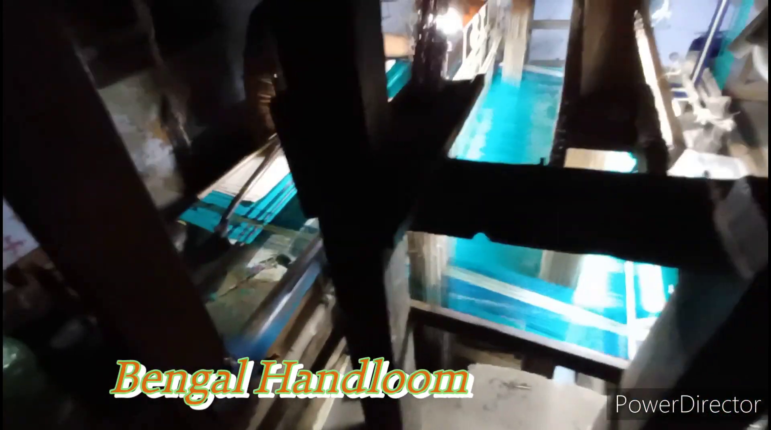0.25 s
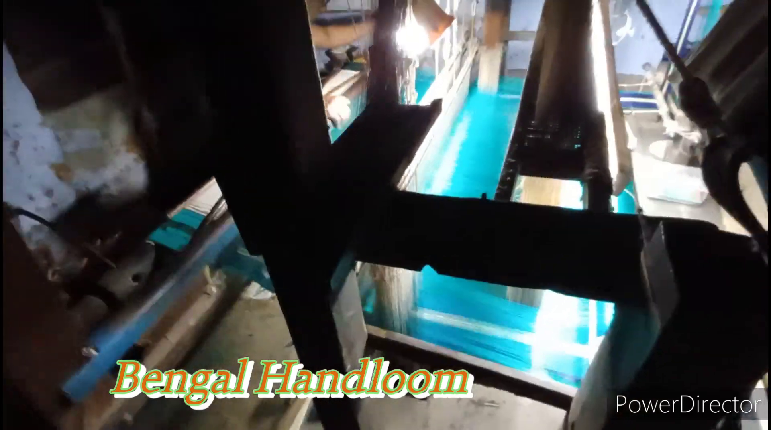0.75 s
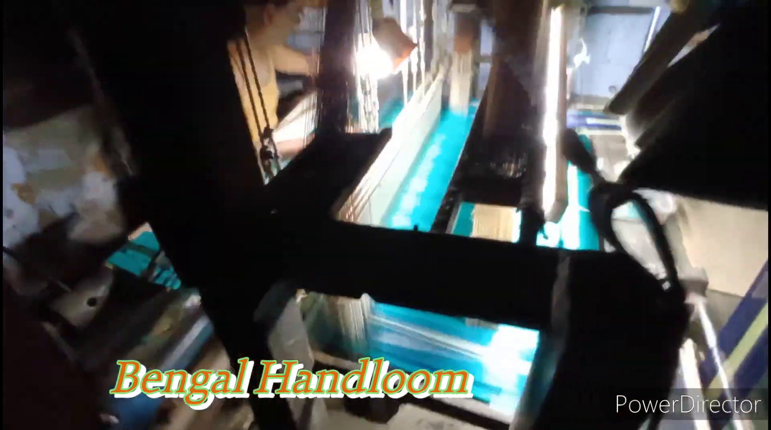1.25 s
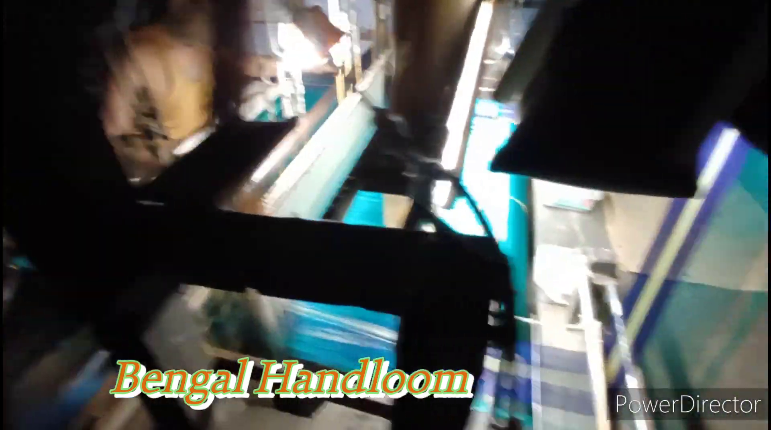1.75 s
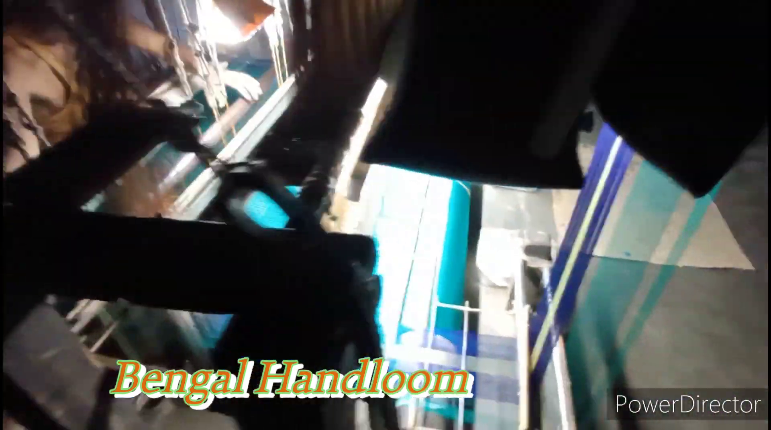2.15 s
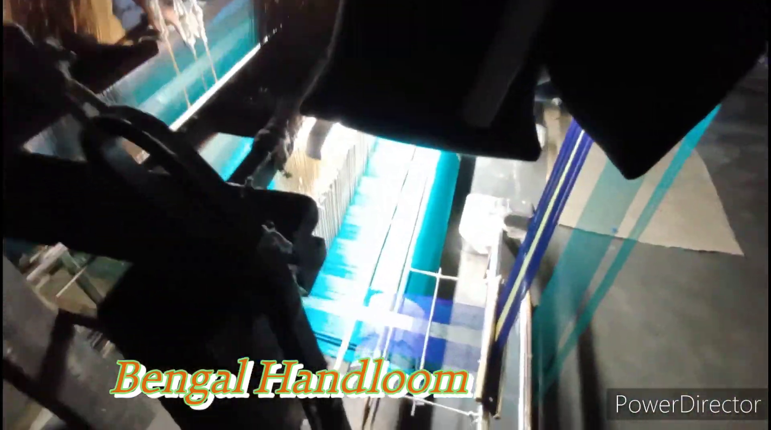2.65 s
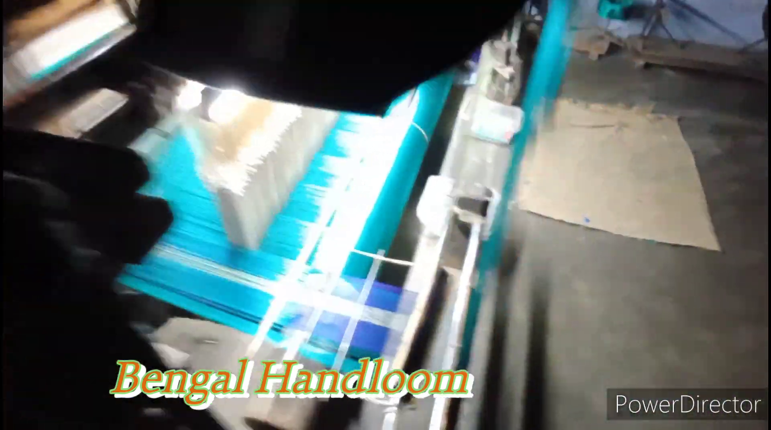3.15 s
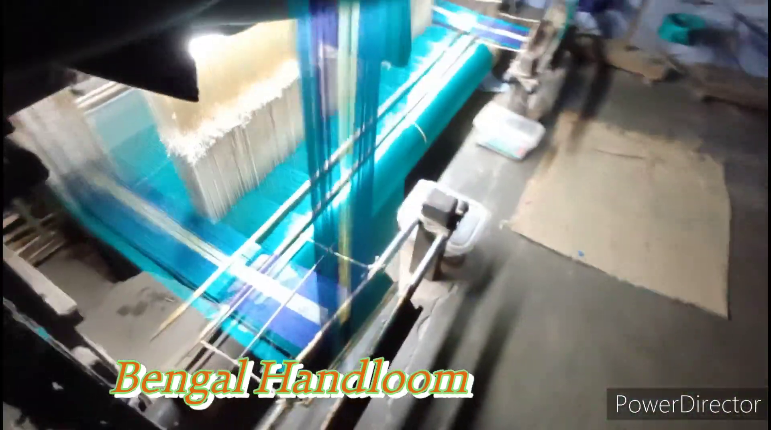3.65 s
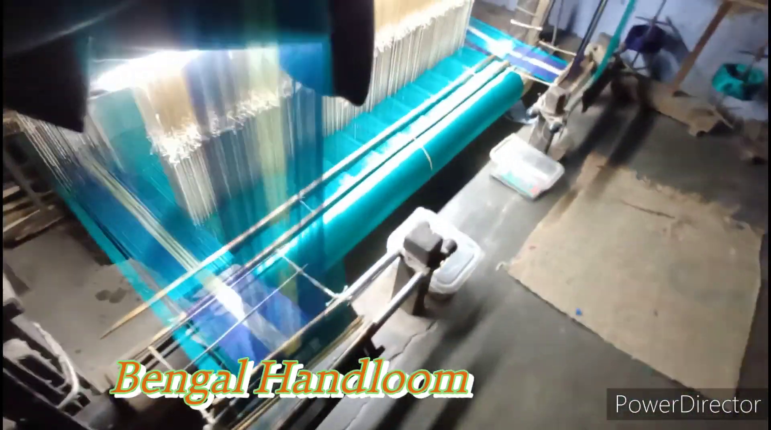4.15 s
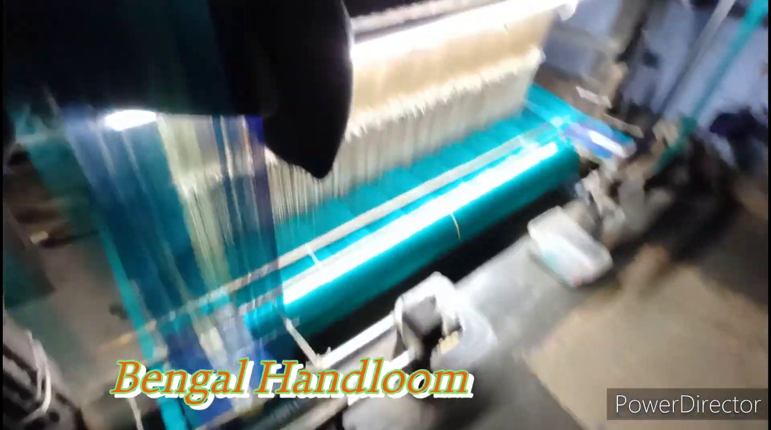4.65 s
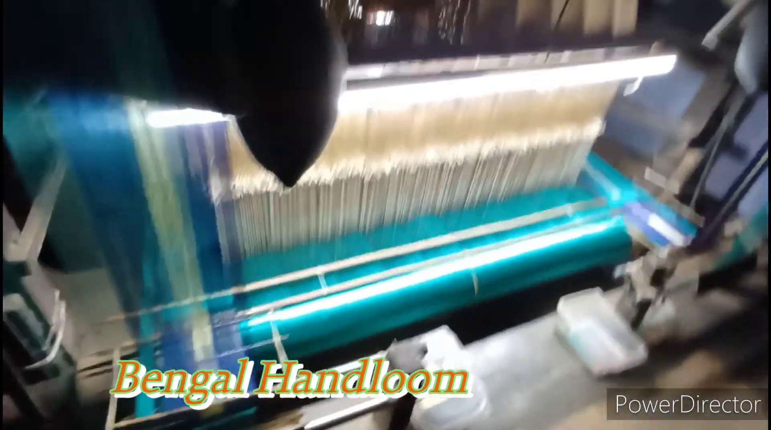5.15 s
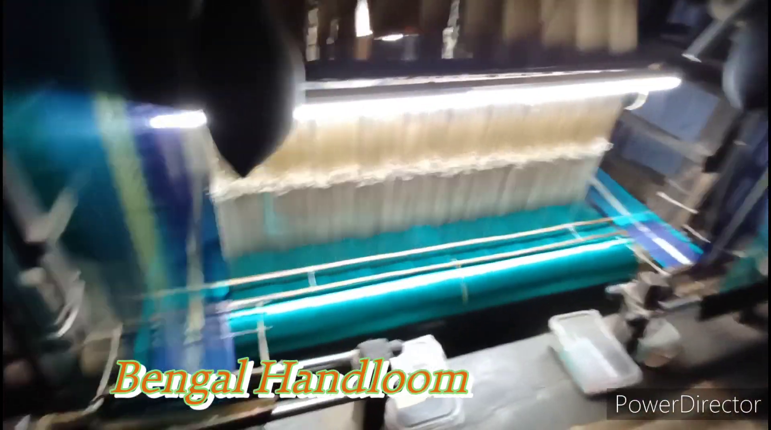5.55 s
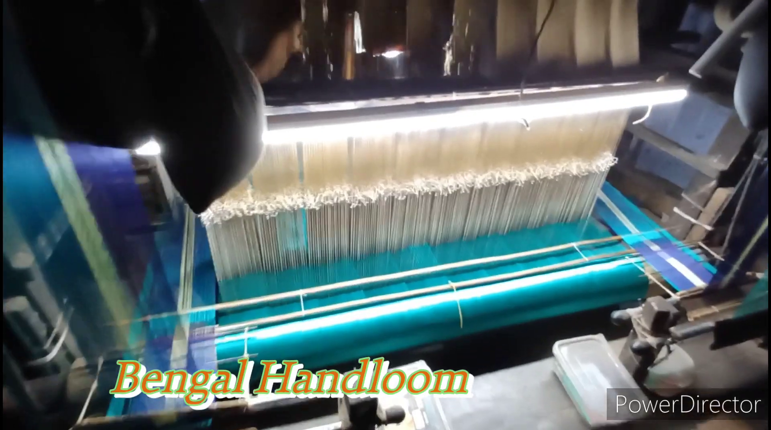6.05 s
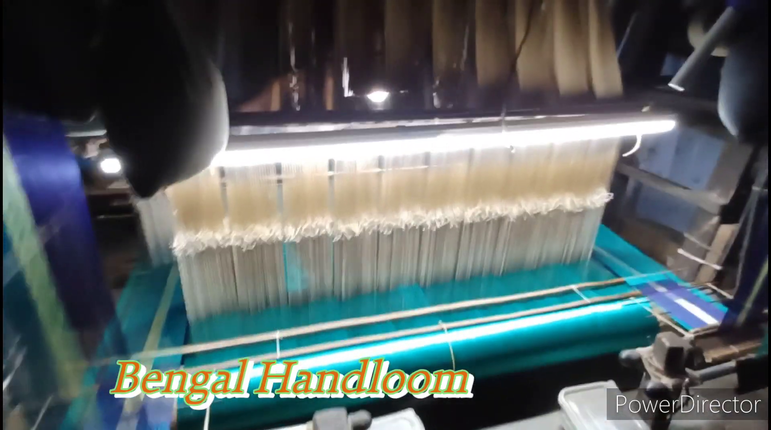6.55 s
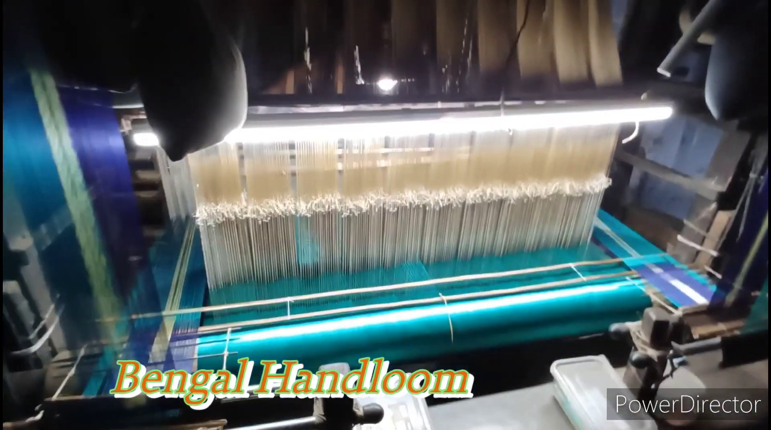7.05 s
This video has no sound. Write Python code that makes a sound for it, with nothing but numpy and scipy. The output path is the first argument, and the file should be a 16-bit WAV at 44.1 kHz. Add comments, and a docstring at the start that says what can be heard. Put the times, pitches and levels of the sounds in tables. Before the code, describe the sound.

A wooden handloom is heard close up, a little to the right, with short hard-walled reflections. At 0.1 s the batten taps lightly, then near quiet. At 0.55 s a treadle clacks with ringing iron and loose knocks; pivots squeak in quick chirps from 0.8 to 1.5 s. A shaft knocks at 0.9 s, threads swish at 1.1 s, the shuttle rattles off at 1.3 s and cracks into its box at 1.55 s, rebounding softly. The cycle repeats: tap 2.2, clack 2.55, swish 3.1, throw with sharp squeaks 3.3, loud catch 3.5; tap 4.0, clack 4.5, heavier knock and low thud 4.8, swish 5.0, squeaky throw 5.2, hard catch 5.45; thread tick 5.75, tap 6.05, clack 6.4, swish 6.9, throw at 7.1 s, cut off before the catch. Low frame rumble, grainy wood sliding and faint thin metallic singing swell with each move.

```python
"""Handloom in a small workshop

A wooden fly-shuttle loom works close by in a hard-walled room, a little to the right, one pick about every 1.9 s.
Treadle, shuttle and batten blows are coloured noise over decaying modes; dry pivots squeak as gliding tones.
The warp threads part with a swish; noise in grains makes the frame rumble and the wood and threads rub.
The shuttle rattles along its race, thin metal sings, and diffuse reflections follow the blows and squeaks."""
import sys
import numpy as np
from scipy import signal
from scipy.fft import rfft, irfft, next_fast_len
from scipy.io import wavfile

SR = 44100
rng = np.random.default_rng(int(sys.argv[2]) if len(sys.argv) > 2 else 0)


def store_wav(level_fs):
    """Save 16-bit WAV to argv[1]."""
    pcm = np.round(np.clip(np.atleast_2d(level_fs), -1, 1) * 32767)
    wavfile.write(sys.argv[1], SR, pcm.T.astype(np.int16))


N = 321048


def from_db(db):
    """Decibels to gain."""
    return 10 ** (np.asarray(db) / 20)


def rms_one(x):
    """Scale to unit rms."""
    return x / np.sqrt(np.mean(x ** 2) + 1e-20)


def at_hz(points, hz):
    """Read a table on a log-frequency axis."""
    points = np.array(points)
    return np.interp(np.log(np.maximum(hz, 1)), np.log(points[:, 0]), points[:, 1])


def dying(t, t60):
    """Exponential decay, 60 dB down after t60."""
    return np.exp(-np.log(1000) * t / np.maximum(t60, 1e-3))


def add(out, s, sound):
    """Mix a sound in at time s."""
    at = int(s * SR)
    sound, at = sound[:, max(-at, 0):], max(at, 0)
    out[:, at:at + sound.shape[1]] += sound[:, :max(N - at, 0)]


def drift(rate, size):
    """Smooth random wander of spread near 1, with rate new values per second."""
    knots = np.arange(size) * rate / SR
    values = rms_one(rng.standard_normal(size // 20))
    return np.interp(knots, np.arange(size // 20), values)


# Likeness of the left and right noise. Each row: frequency in Hz, correlation from 0 to 1.
LIKENESS = [(60, 0.92), (250, 0.94), (500, 0.91), (1000, 0.34), (2000, 0.016), (12000, 0.082)]


def noise(spectrum, size, tilt_db=0, ripple_db=0):
    """Coloured stereo noise, alike on both sides only in the bass, rippled by many small resonances; rms 1."""
    padded = next_fast_len(size, True)
    hz = np.fft.rfftfreq(padded, 1 / SR)
    # the spectrum falls away beyond both ends of its table
    low_end = np.minimum(hz / spectrum[0][0], 1) ** 2
    high_end = np.minimum(spectrum[-1][0] / (hz + 1), 1) ** 4
    peaks_hz = np.geomspace(2500, 25000, 700) - 2500
    ripple = np.interp(hz, peaks_hz, rng.uniform(-1, 1, len(peaks_hz)))
    ripple *= hz / (hz + 800)  # weaker in the bass
    colour_db = at_hz(spectrum, hz) + tilt_db * np.log2(1 + hz / 400) + ripple_db * ripple
    gain = low_end * high_end * from_db(colour_db)
    mid, side = rfft(rng.standard_normal((2, padded)))
    alike = np.clip(at_hz(LIKENESS, hz), -1, 1)
    stereo = np.sqrt(1 + alike) * mid + np.sqrt(1 - alike) * side * [[1], [-1]]
    return rms_one(irfft(gain * stereo, padded)[:, :size])


def ringing(modes, t, detune, split_hz=18, twin_db=-4):
    """Each mode beats with a weaker twin, at random strengths; high modes differ more between the sides."""
    out = np.zeros((2, len(t)))
    for hz, db, t60 in modes:
        hz = hz * (1 + detune * rng.standard_normal())
        twin_hz = hz + split_hz * rng.standard_normal()
        for part_hz, part_db in ((hz, 0), (twin_hz, twin_db)):
            phase = rng.random() + min(hz / 2000, 1) * rng.random((2, 1))
            strength = from_db(db + part_db + rng.uniform(-4, 3))
            out += strength * dying(t, t60) * np.sin(2 * np.pi * (part_hz * t + phase))
    return out


STRIKE_DETUNE = .02   # wooden modes shift by this share with the place and load of each blow


def blows(rows, spectrum, gain_db, attack_s, crack, chatter_db, modes=(), modes_db=0, detune=0):
    """A contact cracks, chatters and dies away in the dense modes of the part, over the ringing of its own modes."""
    out, t = np.zeros((2, N)), np.arange(SR // 2) / SR
    for s, db, tilt_db, t60 in rows:
        body = dying(t, t60) * from_db(chatter_db * drift(269, len(t)))
        body += crack * dying(t, 0.015)
        sound = noise(spectrum, len(t), tilt_db, ripple_db=6) * body
        sound += from_db(modes_db) * ringing(modes, t, detune)
        onset = 1 - np.exp(-t / attack_s)
        add(out, s - .001, from_db(db + gain_db) * sound * onset)
    return out


# Decay of the workshop. Each row: frequency in Hz, t60 in seconds.
ROOM_T60 = [(100, 0.99), (500, 0.35), (2000, 0.21), (6000, 0.34), (14000, 0.18)]


def workshop(x, build_s):
    """Diffuse reflections off hard walls: they build up quickly and die at a different rate in each band."""
    t, edges = np.arange(SR) / SR, np.geomspace(60, 16000, 9)
    tail = 0
    for low, high in zip(edges, edges[1:]):
        band_pass = signal.butter(2, [low, high], "band", fs=SR, output="sos")
        band = signal.sosfilt(band_pass, noise([(20, 0), (20000, 0)], SR))
        tail = tail + band * dying(t, at_hz(ROOM_T60, np.sqrt(low * high)))
    tail = tail * (1 - np.exp(-t / max(build_s, 1e-3)))
    tail = rms_one(tail) / np.sqrt(SR)
    return signal.fftconvolve(x, tail, axes=1)[:, :N]


# Side the loom is heard on. Each row: frequency in Hz, left minus right in dB.
BALANCE_DB = [(60, -2), (250, -0.5), (550, -2.5), (1200, -2.5), (2100, -0.5), (4000, -4), (5700, -7.5),
              (8500, 0), (13000, -2.5)]


def placed(x):
    """The loom is louder on the right, most of all in the low treble."""
    lean_db = at_hz(BALANCE_DB, np.fft.rfftfreq(N, 1 / SR))
    return irfft(rfft(x) * from_db(lean_db * [[.5], [-.5]]), N)


# Rumble swells until 1.5 s, then weakens; the thin metal sings loudest at the start and fades.
# Each row: time in seconds, extra rumble in dB, extra singing in dB.
SLOW_LEVELS = [(0, 0, 7.5), (1.5, 4, 2.5), (3.5, 1, 0), (5.3, -1, 0), (7.28, -1.5, 0)]


def slow_levels_db():
    """Extra level of the rumble and of the singing metal over time."""
    s, *columns = np.transpose(SLOW_LEVELS)
    return [np.interp(np.arange(N) / SR, s, column) for column in columns]


def swell(t, rise_s, hold_s, t60):
    """A stroke gathers speed, holds it and runs out."""
    rise = np.clip(t / max(rise_s, 1e-3), 0, 1)
    return rise * dying(np.maximum(t - rise_s - hold_s, 0), t60)


# Shuttle thrown along its race, the first one already on its way. Each row: start in seconds, strength in dB.
THROWS = [(-0.55, -12), (1.323, -13), (3.285, -12), (5.21, -11), (7.115, -11.5)]
# Rubbing and shaking that each move sets off in parts of the loom.
# Each part: delay in seconds, rise in seconds, hold in seconds, t60 in seconds, relative level in dB.
SHIFT_STROKE = {"frame": (0.0, .04, .03, .4, -63), "wood": (0.0, .04, .08, .4, -50),
                "threads": (0.0, .08, .05, .4, -61)}
TREADLE_STROKE = {"frame": (-.01, .16, .1, .9, -39.5), "wood": (0.0, .15, .09, .54, -27),
                  "threads": (.06, .18, .05, .52, -34.5), "wires": (0.05, .15, .15, .8, -52)}
LANDING_STROKE = {"frame": (0.0, .035, .04, .45, -34.5), "wood": (0.0, .03, .035, .2, -30)}
SWISH_STROKE = {"frame": (.02, .05, .07, .4, -46), "wood": (.04, .14, .06, .12, -32),
                "threads": (.09, .07, .06, .2, -41.5)}
THROW_STROKE = {"frame": (0.0, .11, .02, 1.2, -30.5), "wood": (-.03, .12, .14, 1.0, -23.5),
                "threads": (.0, .06, .08, .4, -39), "wires": (0.0, .1, .45, 1.2, -55)}
CATCH_STROKE = {"wood": (.1, .08, .05, .45, -33), "threads": (.17, .1, .08, .7, -44)}
PULL_STROKE = {"wood": (-.01, .03, .03, .38, -39), "threads": (-.03, .04, .06, .8, -49),
               "wires": (.05, .08, .15, .5, -56)}
BEAT_STROKE = {"frame": (0.0, .04, .04, .5, -52), "threads": (0.0, .05, .09, .25, -56),
               "wires": (0.0, .05, .08, .2, -57)}
# Level between moves. Each part: relative level in dB.
IDLE_DB = {"frame": -68, "wood": -62.5, "threads": -70, "wires": -76}
FORCE_SHARE = .45   # share of a move's extra strength in dB that reaches its stroke


def motion_db(part):
    """Level of one part of the loom: the strokes of all moves add in power, stronger for harder moves."""
    strokes = [(SHIFTS, SHIFT_STROKE), (CLACKS, TREADLE_STROKE), (LANDINGS, LANDING_STROKE),
               (SWISHES, SWISH_STROKE), (THROWS, THROW_STROKE), (CATCHES, CATCH_STROKE),
               (PULLS, PULL_STROKE), (BEATS, BEAT_STROKE)]
    t = np.arange(0, N, 64) / SR
    power = np.full(len(t), from_db(IDLE_DB[part]) ** 2)
    for moves, stroke in strokes:
        if part not in stroke:
            continue
        delay_s, rise_s, hold_s, t60, level_db = stroke[part]
        usual_db = np.mean([db for s, db, *rest in moves])
        for s, db, *rest in moves:
            gain = from_db(level_db + FORCE_SHARE * (db - usual_db))
            power += (gain * swell(t - s - delay_s, rise_s, hold_s, t60)) ** 2
    return np.interp(np.arange(N) / SR, t, 10 * np.log10(power))


def rubbing(spectrum, level_db, grain_db, grain_rate, ripple_db):
    """Surfaces catch and release as they slide, so the friction noise comes in grains."""
    grains = from_db(grain_db * drift(grain_rate, N))
    return from_db(level_db) * rms_one(noise(spectrum, N, 0, ripple_db) * grains)


# Colour of the frame's rumble. Each row: frequency in Hz, density in dB per Hz.
RUMBLE = [(25, -31), (42, -4), (65, 6), (97, -2.5), (130, 1.5), (192, -11), (240, -2), (330, -7),
          (430, -17), (730, -120)]


def frame_rumble(extra_db):
    """The heavy frame shakes with each move: slow-grained low noise."""
    return rubbing(RUMBLE, motion_db("frame") + extra_db - .5, grain_db=2.5, grain_rate=40, ripple_db=-1)


# Thin metal parts singing as the loom shakes them. Each row: frequency in Hz, width in Hz, relative level in dB.
WIRES = [(5070, 80, -13), (7370, 40, -10), (9900, 110, -2), (12430, 50, 3), (14350, 120, -4)]


def wires(level_db, flutter_db):
    """Constant small contacts keep the narrow resonances of thin metal ringing."""
    out = np.zeros((2, N))
    for hz, width_hz, db in WIRES:
        r = np.exp(-np.pi * width_hz / SR)
        contacts = rng.standard_normal((2, N)) * from_db(flutter_db * drift(12, N))
        poles = [1, -2 * r * np.cos(2 * np.pi * hz / SR), r * r]
        out += from_db(db) * rms_one(signal.lfilter([1, 0, -1], poles, contacts))
    return rms_one(out) * from_db(level_db)


# Colour of the rubbing threads. Each row: frequency in Hz, density in dB per Hz.
THREADS = [(3000, -21), (5500, -12.5), (7300, -7), (9000, -7), (10200, -8.5), (12500, -2), (14200, -4.5),
           (15700, -10.5)]


def thread_rubbing():
    """Threads slide past each other: bright friction noise in very fine grains."""
    return rubbing(THREADS, motion_db("threads") + 2.5, grain_db=2.0, grain_rate=1200, ripple_db=9)


# Ringing of the shuttle race. Each row: frequency in Hz, relative level in dB, t60 in seconds when struck freely.
RACE = [(255, -11, 0.2), (510, -2, 0.13), (630, -1, .12), (790, -4.5, .1), (1120, -1, .11),
        (1310, -1, 0.11), (1550, -2, 0.12), (1950, 1, 0.14), (2177, -1, 0.12), (2410, -4, 0.18)]
RATTLES_PER_S, RATTLE_SPREAD_DB = 60, 4   # small loose contacts while the wood slides
RATTLE_DAMPING = .2   # share of their ring time that the modes keep while parts rub on them


def rattle(level_db):
    """Loose parts touch at random as they slide; each touch rings the modes of the race with its own strengths."""
    happens = rng.random(N) < RATTLES_PER_S / SR
    touches = happens * from_db(RATTLE_SPREAD_DB * rng.uniform(-1.7, 1.7, N))
    touches = rms_one(touches) * from_db(level_db)
    out = np.zeros((2, N))
    for hz, db, t60 in RACE:
        r, w = dying(1 / SR, t60 * RATTLE_DAMPING), 2 * np.pi * hz / SR
        strengths = rng.standard_normal(N) + min(hz / 1000, 2) * rng.standard_normal((2, N))
        push = touches * rms_one(strengths) + 1e-18
        poles = [1, -2 * r * np.cos(w), r * r]
        out += from_db(db) * signal.lfilter([0, np.sin(w) * np.sqrt(1 - r)], poles, push)
    return out


# Colour of the sliding wood. Each row: frequency in Hz, density in dB per Hz.
SLIDE = [(120, -48), (200, -8), (258, 2.5), (470, 1), (660, 4), (1150, 2), (1330, -0.5), (2050, 5),
         (2730, -1.5), (4060, -2), (4840, -6), (5320, -3), (9000, -33), (12500, -57)]


def wood_sliding():
    """Wood slides on wood: grained friction noise with loose parts rattling in it."""
    slide_db = motion_db("wood")
    friction = rubbing(SLIDE, slide_db - 5.3, grain_db=3, grain_rate=200, ripple_db=6)
    return friction + rattle(slide_db - 13)


# Low thuds of the frame, mostly as the batten lands. Each row: start in seconds, relative level in dB.
THUDS = [(0.115, -41), (2.171, -33.5), (3.983, -39), (4.15, -41), (4.785, -27), (6.047, -35), (6.1, -36.5)]
# Colour of a thud. Each row: frequency in Hz, density in dB per Hz.
THUD_COLOUR = [(115, 3), (140, 0), (190, -10), (270, 5), (420, -3.5)]
# Low ringing of the frame. Each row: frequency in Hz, relative level in dB, t60 in seconds.
FRAME = [(135, 0, .4), (295, -1, .25)]


def thuds(t60):
    """The heavy frame swells into a low, ringing thud."""
    rows = [(s, db, 0, t60) for s, db in THUDS]
    return blows(rows, THUD_COLOUR, gain_db=-2, attack_s=.012, crack=0, chatter_db=0,
                 modes=FRAME, modes_db=-6, detune=STRIKE_DETUNE)


# A few taut threads tick past each other. Each row: start in seconds, relative level in dB.
TICKS = [(2.341, -41.5), (2.41, -51), (4.245, -51), (4.315, -51), (5.738, -30), (6.2905, -42)]
TICK_TILT_DB, TICK_T60_S = -1, .11   # brightness per octave and decay of every tick


def thread_ticks():
    """A taut thread slips past another: a short burst in the colour of the swish."""
    rows = [(s, db, TICK_TILT_DB, TICK_T60_S) for s, db in TICKS]
    return blows(rows, SWISH_COLOUR, gain_db=-2, attack_s=.002, crack=0, chatter_db=2.2)


# Warp threads springing apart.
# Each row: start in seconds, relative level in dB, brightness in dB per octave, t60 in seconds.
SWISHES = [(1.113, -25, 0.5, 0.6), (3.063, -24.5, -1, 0.48), (4.965, -24, 0.0, 0.66),
           (6.886, -25.5, 0.5, 0.58)]
# Colour of a swish. Each row: frequency in Hz, density in dB per Hz.
SWISH_COLOUR = [(300, -11), (1400, -8.5), (2400, -4.5), (3500, -3.5), (6200, -1), (9000, -4), (13000, 4),
                (15500, -5)]


def warp_swishes():
    """Many threads spring apart together: a soft-edged burst of bright noise."""
    return blows(SWISHES, SWISH_COLOUR, gain_db=-2, attack_s=.011, crack=0, chatter_db=2.2)


# A faint thin whistle, as of a thread, then pivot squeaks, mostly on every other pick.
# Each row: start in seconds, length in seconds, start pitch in Hz, end pitch in Hz, relative level in dB.
WHISTLE_AND_SQUEAKS = [(0.37, .1, 12560, 12500, -54), (0.812, 0.046, 1720, 1880, -28),
                       (.847, .02, 1960, 2130, -22.5), (.862, .034, 2170, 2320, -29),
                       (.965, .05, 2000, 2170, -35), (1.008, 0.052, 1730, 1830, -28.5),
                       (1.04, .04, 2010, 1990, -34), (1.193, 0.074, 2290, 2450, -22),
                       (1.203, 0.058, 1793, 2060, -29.5), (1.31, 0.03, 2630, 2600, -24),
                       (1.338, .028, 1900, 2080, -24.5), (1.355, .035, 2470, 2340, -25),
                       (1.435, .06, 2530, 2570, -27), (3.305, .021, 1983, 1950, -16),
                       (3.362, 0.033, 1994, 1960, -18), (4.72, .05, 1790, 1830, -33),
                       (4.742, .055, 1930, 2030, -27.5), (4.80, .085, 1960, 2130, -32),
                       (4.835, 0.05, 1020, 1047, -31.5), (4.895, 0.068, 1990, 1915, -30),
                       (5.077, 0.068, 2130, 2400, -24.5), (5.187, .035, 2610, 2600, -29.5),
                       (5.215, 0.072, 1830, 2290, -18.5), (7.132, 0.048, 1924, 1970, -21)]
# Rasp of the dry pivot. Each row: frequency in Hz, density in dB per Hz.
SCRAPE = [(1400, -22), (1750, -3), (2050, 0), (2350, -4), (2800, -22)]
GLIDE_CURVE = .75   # below 1 the pitch moves fast at first, then settles


def whistle_and_squeaks(waver_hz, rough, rasp, scrape, overtone_db, low_db):
    """Stick-slip, in the squeaks that of a dry pivot: a narrow gliding, slightly uneven tone over a faint scrape."""
    out, size = np.zeros((2, N)), SR // 8
    for s, length, start_hz, end_hz, db in WHISTLE_AND_SQUEAKS:
        along = np.minimum(np.arange(size) / SR / max(length, .005), 1)
        hz = start_hz + (end_hz - start_hz) * along ** GLIDE_CURVE + waver_hz * drift(387, size)
        phase = 2 * np.pi * np.cumsum(hz) / SR + np.pi * rng.random((2, 1))
        loudness = np.abs(np.sin(np.pi * along)) ** 0.5 * (1 + rough * drift(345, size))
        tone = np.sin(phase) + rasp * drift(900, size) * np.cos(phase)
        tone += scrape * noise(SCRAPE, size)
        tone += from_db(overtone_db) * (np.sin(2 * phase) + np.sin(3 * phase) / 2)
        # strong and weak slips alternate at times, which sounds an octave below
        tone += from_db(low_db) * drift(218, size) * np.sin(phase / 2)
        add(out, s, from_db(db) * loudness * tone)
    return out


# Moves of the loom. Each row: start in seconds, relative level in dB.
# Heddle shafts reaching the end of their travel:
LANDINGS = [(0.891, -21), (2.881, -18.5), (4.779, -12.5), (6.704, -14.3)]
# Batten pulled towards the cloth:
PULLS = [(0.036, -27), (1.922, -29.5), (3.874, -27), (5.82, -21)]
# Foot shifting onto the next treadle:
SHIFTS = [(0.42, -45), (.475, -43), (2.479, -42), (4.385, -48), (6.238, -42)]
# Loose wooden parts knock in the same way after each move.
# Each row: delay in seconds, dB above the move's level, brightness in dB per octave, t60 in seconds.
TREADLE_KNOCKS = [(0.104, 5.5, 1.3, 0.22), (0.15, 4, 0.3, 0.2)]
DULL_KNOCKS = [(0.0, .5, -1.2, 0.17)]
LIGHT_KNOCKS = [(0.0, 0.0, 0.6, 0.16)]
# Colour of a wooden knock. Each row: frequency in Hz, density in dB per Hz.
KNOCK_COLOUR = [(100, -15.5), (380, -2.5), (520, 2), (780, 0), (1300, -1), (2100, -2.5), (2900, -6.5),
                (5800, -8.5), (9000, -20), (12300, -19), (15500, -37)]


def loose_knocks():
    """Foot, heddle shaft and batten moves each bring wooden knocks from loose parts."""
    runs = [(CLACKS, TREADLE_KNOCKS), (LANDINGS, DULL_KNOCKS), (PULLS, LIGHT_KNOCKS), (SHIFTS, DULL_KNOCKS)]
    rows = []
    for moves, run in runs:
        for s, db, *rest in moves:
            for delay_s, above_db, tilt_db, t60 in run:
                rows.append((s + delay_s, db + above_db, tilt_db, t60))
    return blows(rows, KNOCK_COLOUR, gain_db=-6.0, attack_s=.005, crack=0.45, chatter_db=2,
                 modes=RACE, modes_db=-15, detune=STRIKE_DETUNE)


# Batten on the cloth.
# Each row: start in seconds, relative level in dB, brightness in dB per octave, t60 in seconds.
BEATS = [(0.116, -20, 1, 0.11), (2.172, -24.5, 2.5, 0.095), (3.983, -24, 2.5, 0.11), (6.048, -25, 4, 0.09)]
# Colour of a beat. Each row: frequency in Hz, density in dB per Hz.
BEAT_COLOUR = [(100, -18), (270, 4), (550, -1.5), (1500, 0), (3000, -4), (4200, -7.5), (6500, -22.5),
               (9500, -35), (15000, -28)]
# Ringing of the batten with its reed. Each row: frequency in Hz, relative level in dB, t60 in seconds.
BATTEN = [(680, -2, .05), (1545, 0, 0.06), (2170, 2, 0.06), (3110, -2, 0.05), (3920, -2, 0.06)]


def batten_beats():
    """The batten taps the cloth: a short noise burst over quickly damped modes."""
    return blows(BEATS, BEAT_COLOUR, gain_db=-4.3, attack_s=.001, crack=.15, chatter_db=1.5,
                 modes=BATTEN, modes_db=-10, detune=STRIKE_DETUNE)


# Treadle clacks.
# Each row: start in seconds, relative level in dB, brightness in dB per octave, t60 in seconds.
CLACKS = [(0.561, -27, 1, 0.75), (2.540, -24, 2, 0.6), (4.467, -22, 0.5, 0.52), (6.382, -23, 2, 0.53)]
# Colour of a clack. Each row: frequency in Hz, density in dB per Hz.
CLACK_COLOUR = [(100, -16.5), (350, -7.5), (520, 3), (880, -3.5), (1300, -0.5), (2100, 0), (2800, -7.5),
                (5000, -7), (8000, -12), (9000, -20), (12500, -17), (15500, -28)]
# Ringing of the treadle's iron fittings. Each row: frequency in Hz, relative level in dB, t60 in seconds.
FITTINGS = [(3368, 4, 0.4), (4045, 3.5, 0.35), (5055, -1, .5), (5272, 3.5, 0.55), (6420, -3, .3),
            (7420, -1, 0.25), (8260, -3.5, 0.3), (10440, -8, 0.2)]


def treadle_clacks():
    """The treadle clacks, a wooden noise burst, and its iron fittings ring."""
    return blows(CLACKS, CLACK_COLOUR, gain_db=-4, attack_s=.003, crack=0.069, chatter_db=2.5,
                 modes=FITTINGS, modes_db=-10)


# Shuttle knocking along its race and rebounding in its box.
# Each row: start in seconds, relative level in dB, brightness in dB per octave, t60 in seconds.
SHUTTLE_KNOCKS = [(1.323, -16, 1.3, .3), (1.339, -11, 1, .2), (1.413, -10.5, .3, .27), (1.576, -13, 1, .15),
                  (1.745, -24, 0, .22), (1.88, -30, 4, .09), (3.276, -19, 1.3, .2), (3.287, -13, 1.3, .22),
                  (3.313, -12, .6, .13), (3.357, -10.5, -.5, .15), (3.378, -10, .8, .17),
                  (3.553, -16, 0, .14), (3.658, -22, .3, .26), (3.695, -20, 1, .22), (5.209, -11.5, 1, .24),
                  (5.228, -13, 1, .15), (5.291, -9.5, .3, .18), (5.304, -8.5, 0, .17), (5.503, -17, -1, .2),
                  (5.585, -21, .3, .25), (5.634, -20.5, -1, .16), (5.681, -21.5, -.3, .2),
                  (7.078, -26, 0, .25), (7.117, -8.5, 1.3, .22), (7.138, -11.5, .3, .16),
                  (7.197, -9.5, .5, .24)]


def shuttle_knocks():
    """The shuttle knocks on its race and rebounds in its box, ringing the modes of the race."""
    return blows(SHUTTLE_KNOCKS, KNOCK_COLOUR, gain_db=-7.5, attack_s=.003, crack=.5, chatter_db=1.8,
                 modes=RACE, modes_db=-10.5, detune=STRIKE_DETUNE)


# Shuttle caught in its box.
# Each row: start in seconds, relative level in dB, brightness in dB per octave, t60 in seconds.
CATCHES = [(1.549, -10, 0.3, 0.48), (3.503, -7.7, -1.5, 0.28), (5.438, -7, -1, 0.33)]
# Colour of a catch. Each row: frequency in Hz, density in dB per Hz.
CATCH_COLOUR = [(100, -25.5), (350, -12), (530, -1.5), (1000, -18.5), (1300, 0.5), (1700, -1.5), (2050, -2),
                (3500, -8.5), (5500, -13.5), (8000, -6), (9500, -24), (12200, -7.5), (15500, -32)]
# Ringing of the shuttle's metal tip. Each row: frequency in Hz, relative level in dB, t60 in seconds.
TIP = [(540, -3, 0.22), (1310, -1.5, 0.13), (1950, -2, 0.22), (4226, -2, 0.25), (6540, -3, 0.22),
       (7660, -2, 0.22), (8130, -5, 0.12), (11700, -11, 0.2)]


def shuttle_catches():
    """The shuttle cracks into its box, a hard-edged noise burst, and its metal tip rings."""
    return blows(CATCHES, CATCH_COLOUR, gain_db=-8, attack_s=.001, crack=.45, chatter_db=1.8,
                 modes=TIP, modes_db=-10.5)


def scene():
    """Blows and squeaks in the room, over the rubbing and rumbling of the moving loom."""
    extra_rumble_db, extra_singing_db = slow_levels_db()
    moving = frame_rumble(extra_rumble_db) + thread_rubbing() + wood_sliding()
    moving += wires(motion_db("wires") + extra_singing_db, flutter_db=4.5)
    hits = warp_swishes() + thread_ticks() + loose_knocks() + batten_beats()
    hits += treadle_clacks() + shuttle_knocks() + shuttle_catches()
    creaks = whistle_and_squeaks(waver_hz=22, rough=.3, rasp=.22, scrape=.27, overtone_db=-18, low_db=-20)
    near = hits + from_db(.5) * creaks + thuds(t60=0.34)
    room = workshop(from_db(-4.0) * hits + from_db(-6) * creaks, build_s=0.0014)
    return placed(near + room + moving)


CUTOFF_HZ = 15750


def record(dry):
    """The top is cut steeply by a low-pass filter."""
    low_pass = signal.ellip(12, .1, 80, CUTOFF_HZ, fs=SR, output="sos")
    return signal.sosfilt(low_pass, dry)


dry = scene()
out = record(dry)
store_wav(out)
```